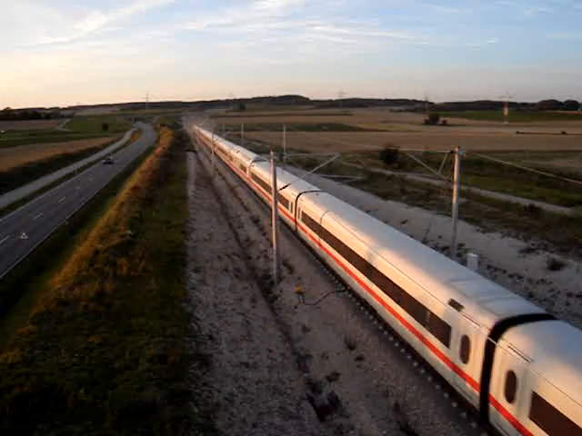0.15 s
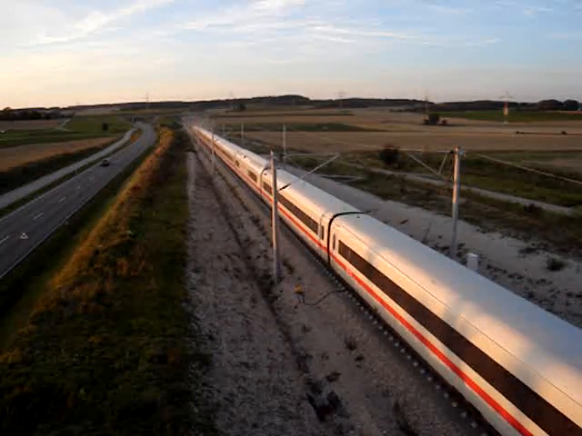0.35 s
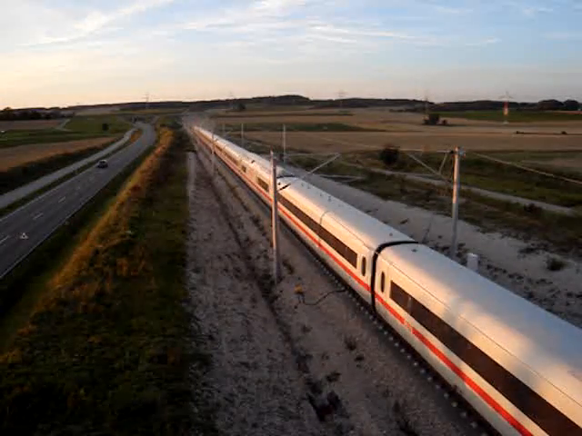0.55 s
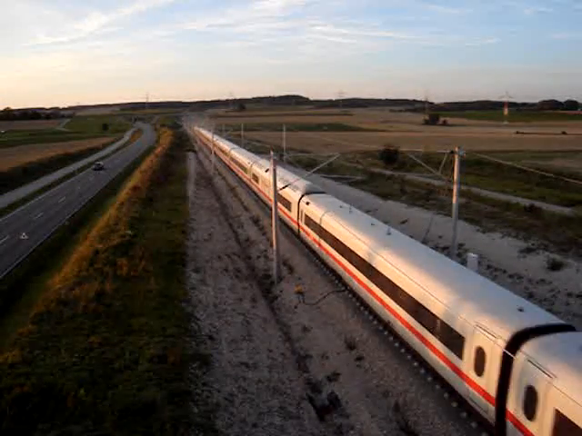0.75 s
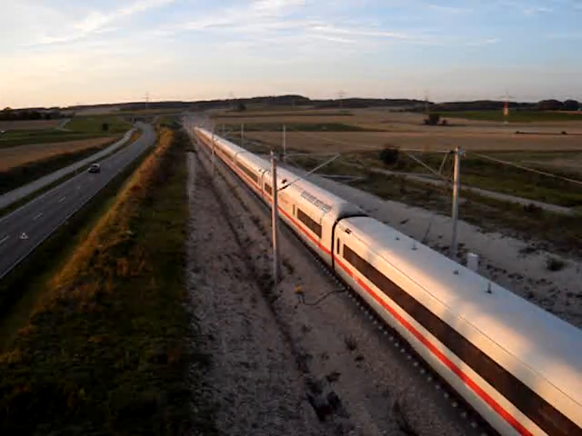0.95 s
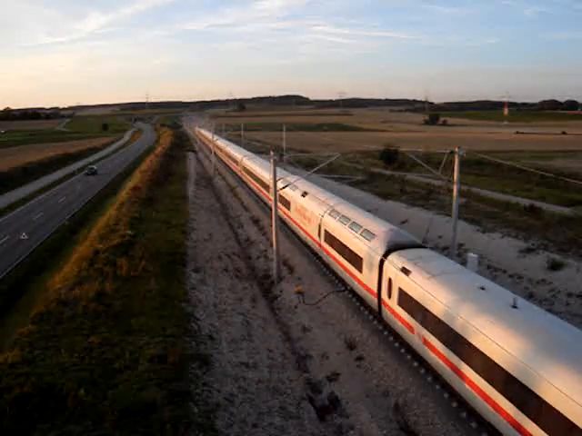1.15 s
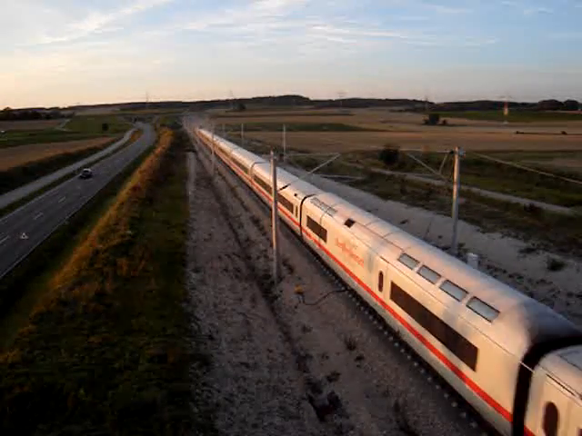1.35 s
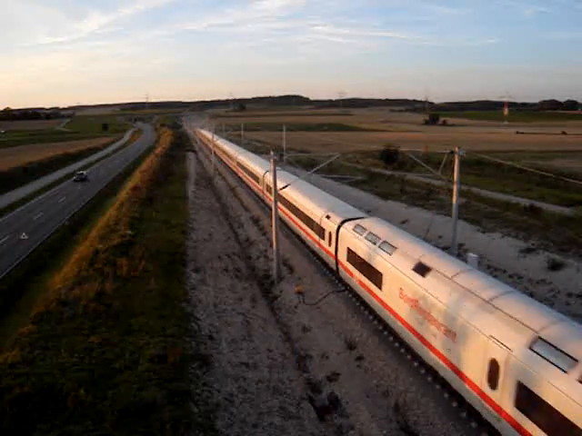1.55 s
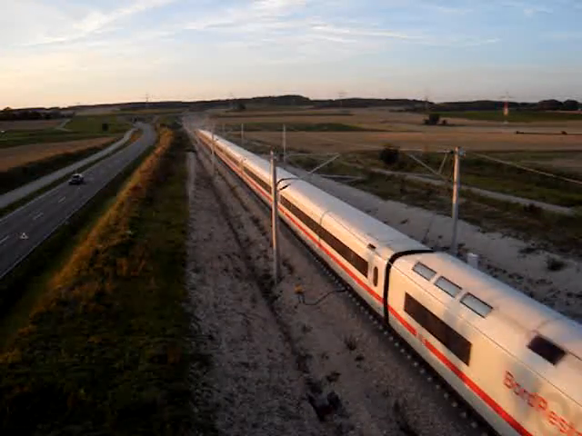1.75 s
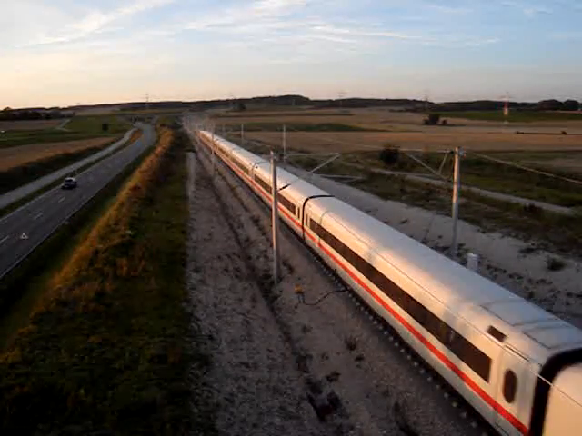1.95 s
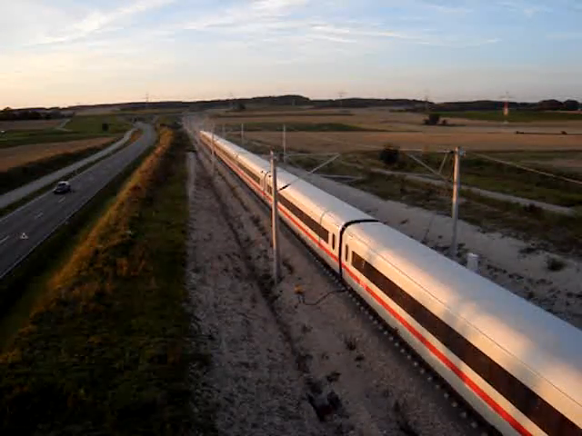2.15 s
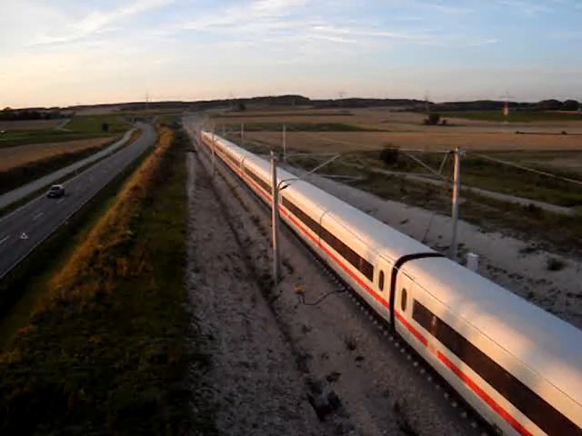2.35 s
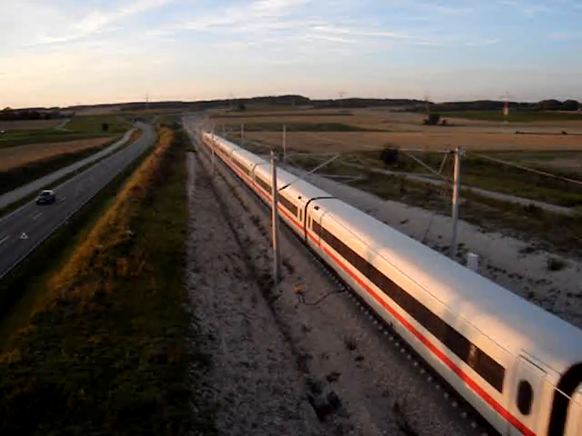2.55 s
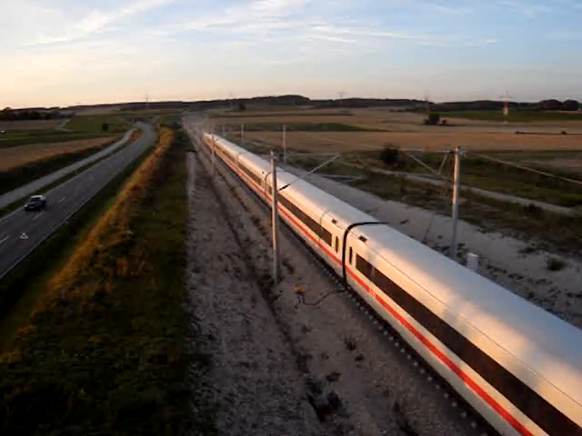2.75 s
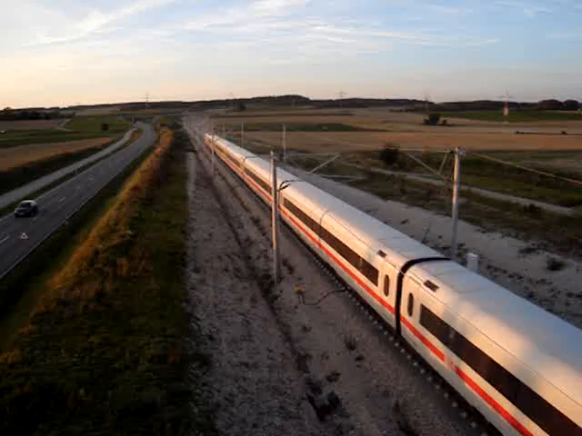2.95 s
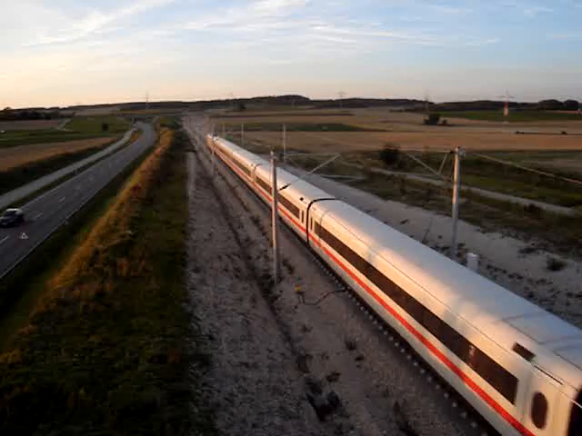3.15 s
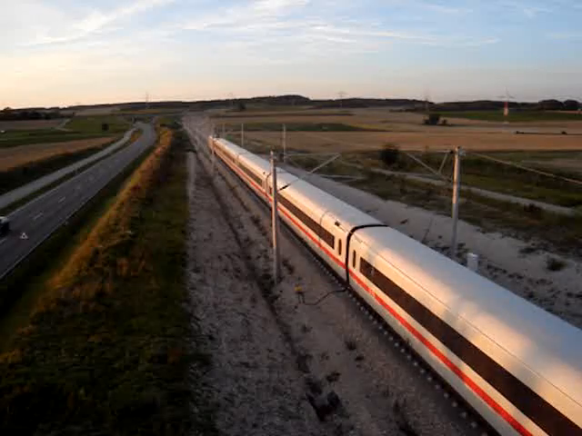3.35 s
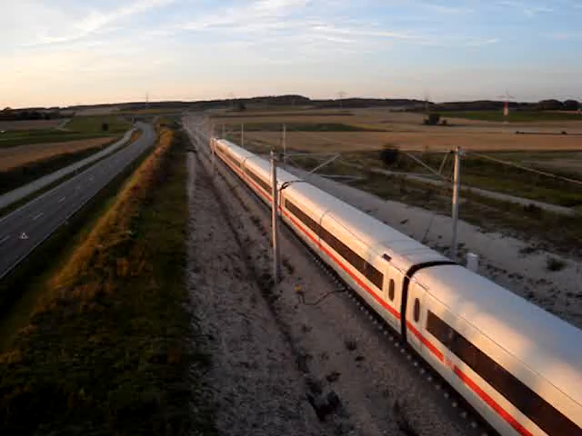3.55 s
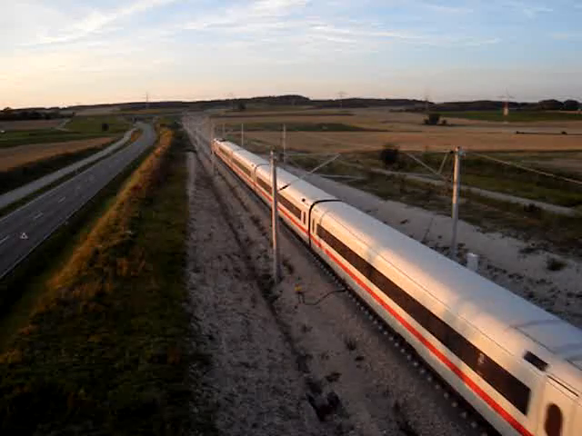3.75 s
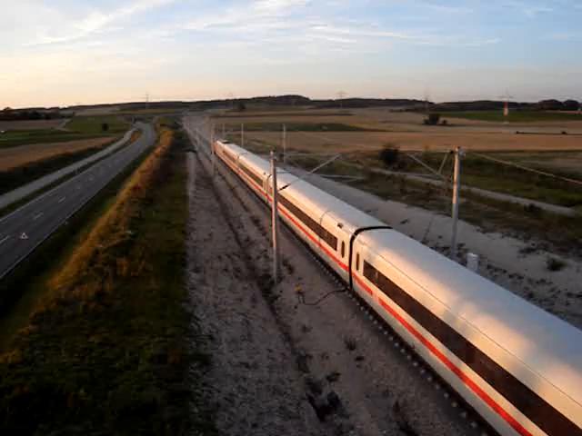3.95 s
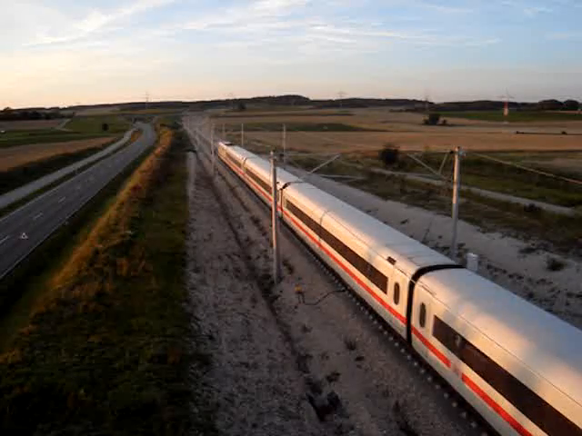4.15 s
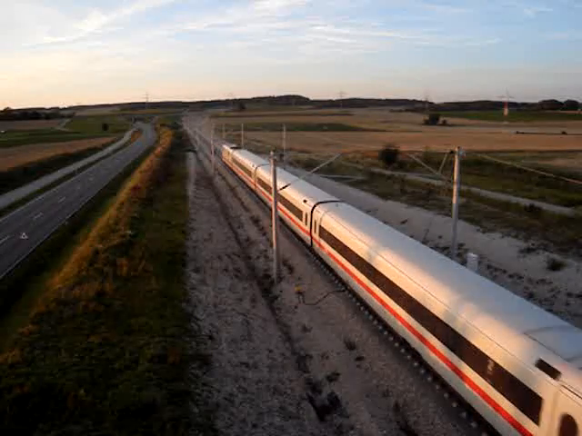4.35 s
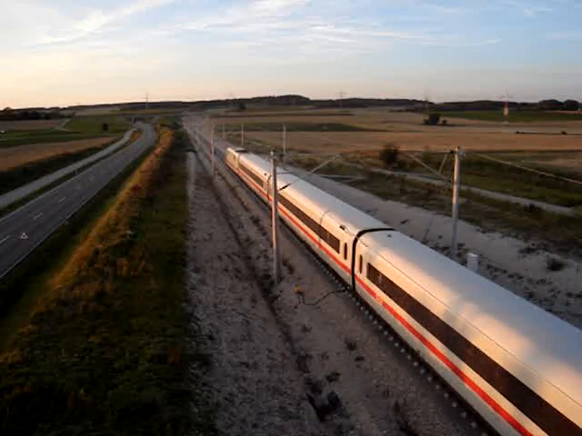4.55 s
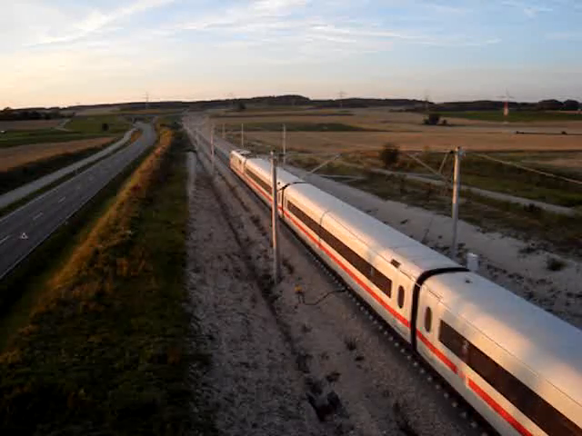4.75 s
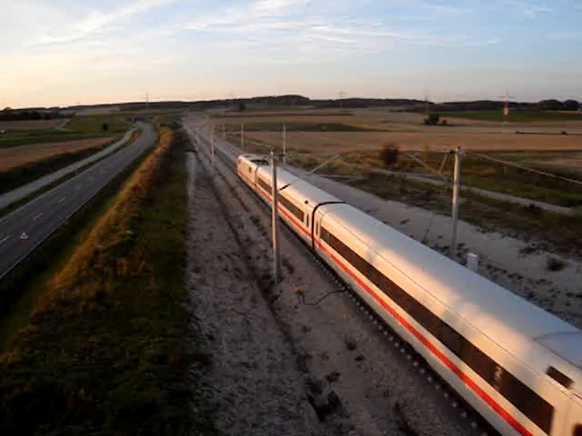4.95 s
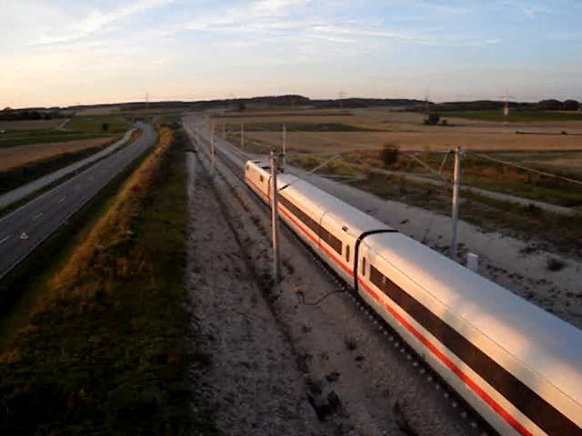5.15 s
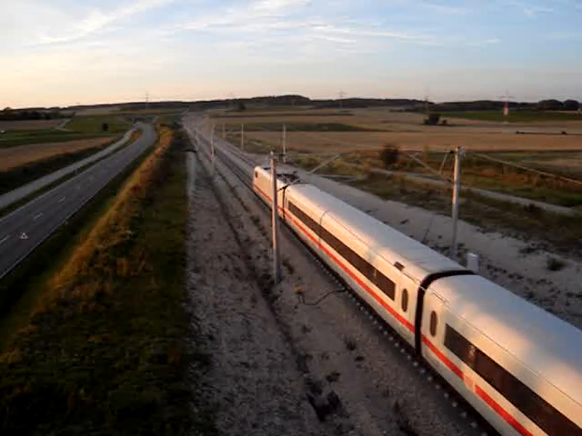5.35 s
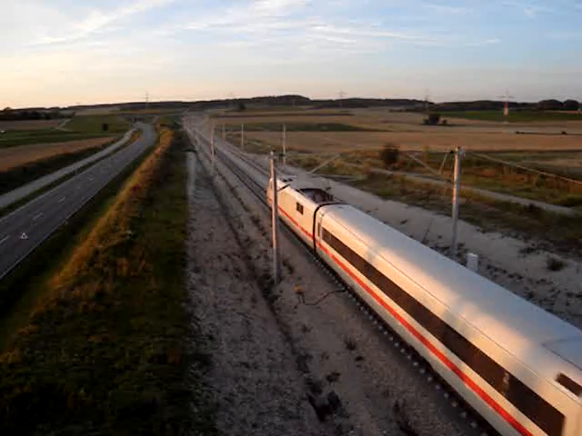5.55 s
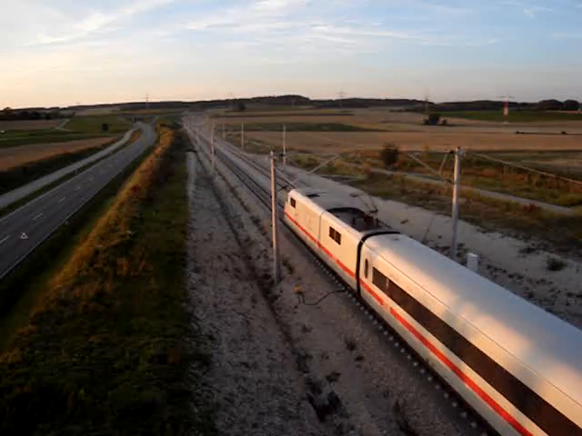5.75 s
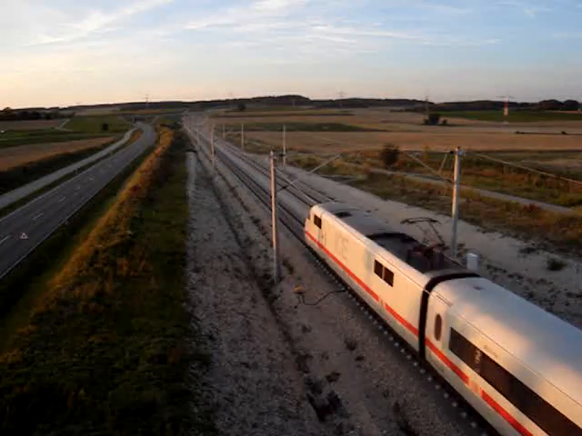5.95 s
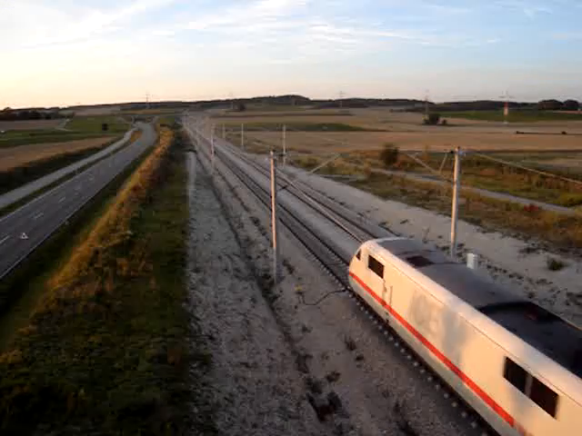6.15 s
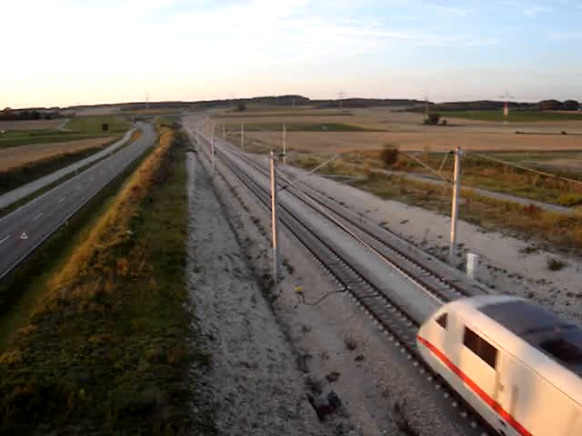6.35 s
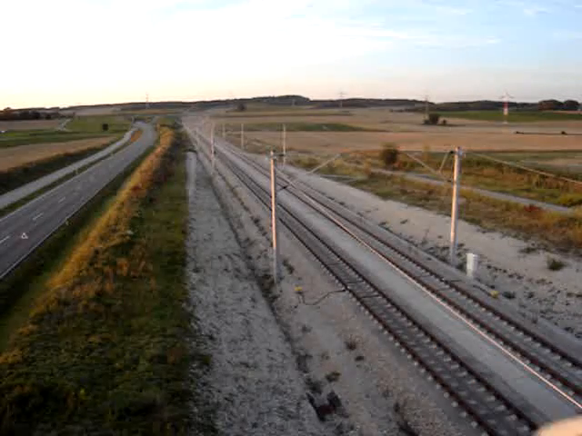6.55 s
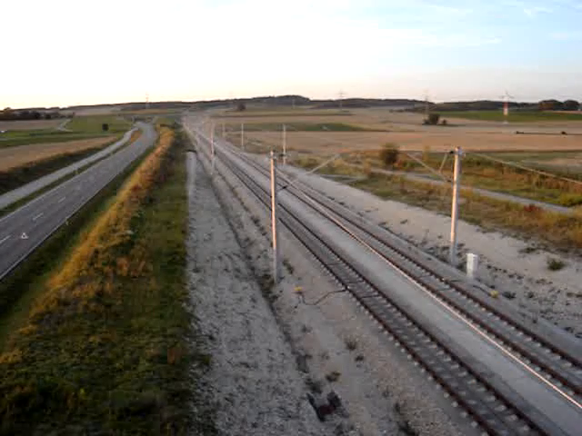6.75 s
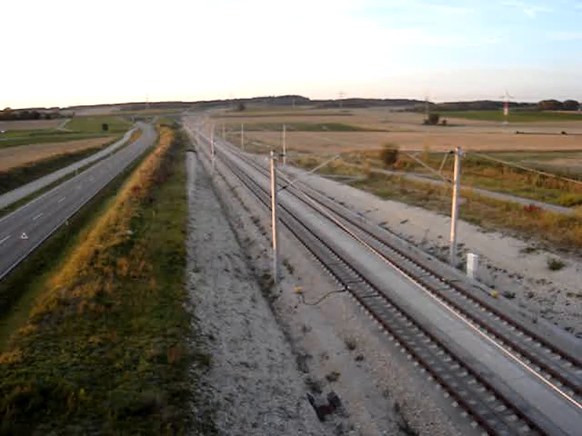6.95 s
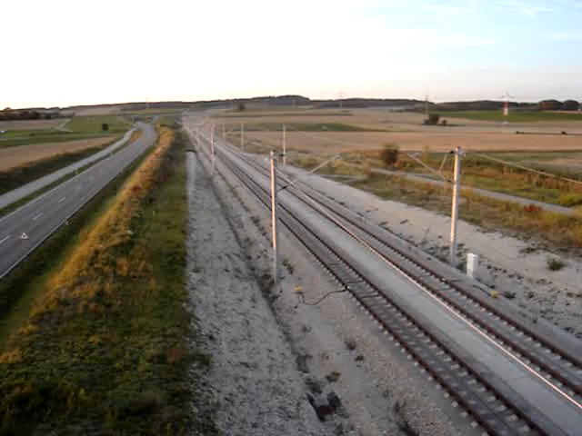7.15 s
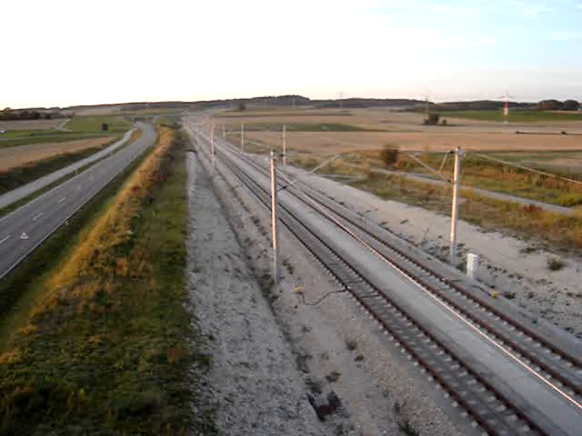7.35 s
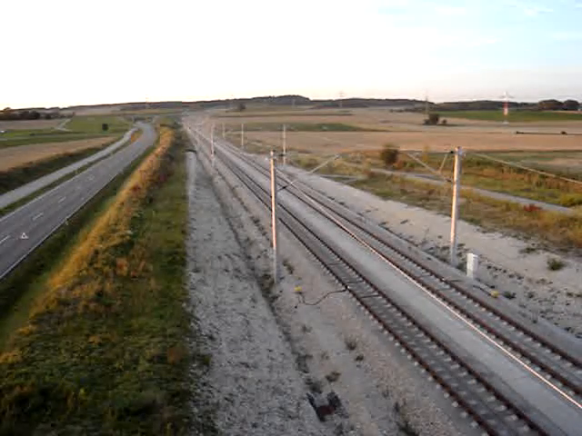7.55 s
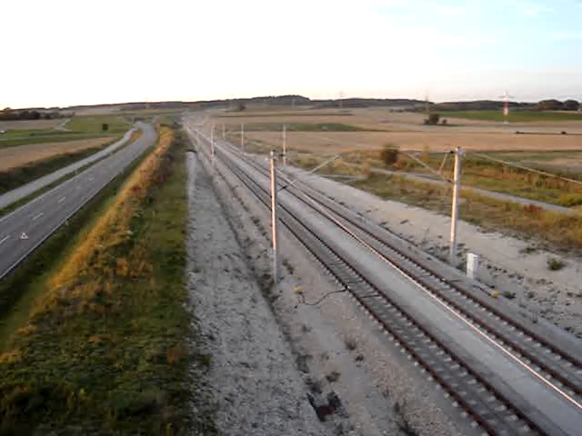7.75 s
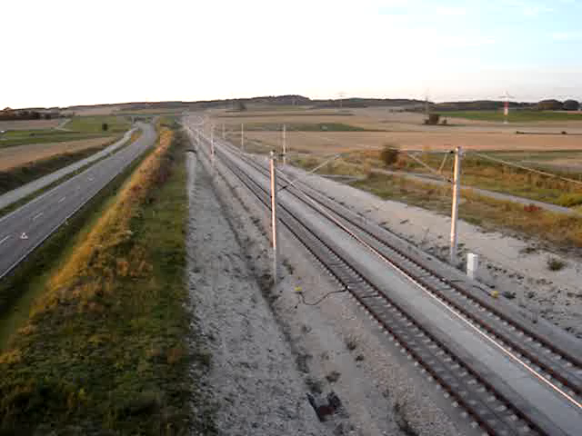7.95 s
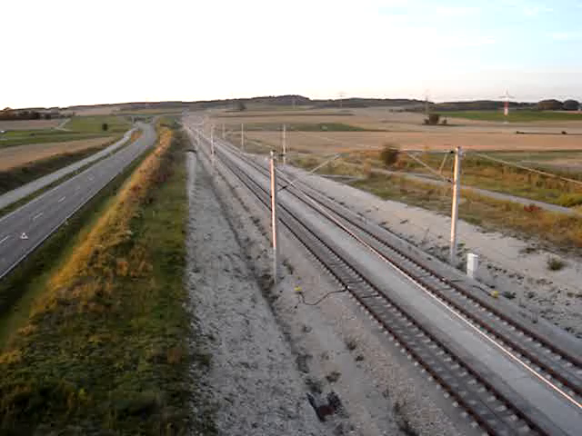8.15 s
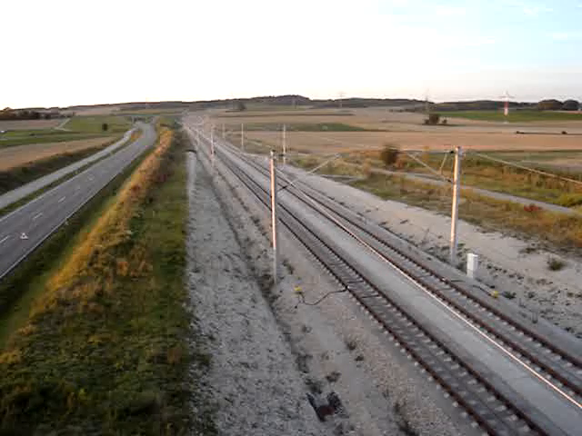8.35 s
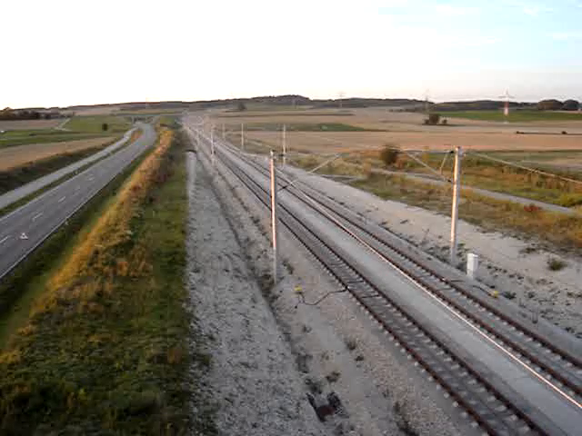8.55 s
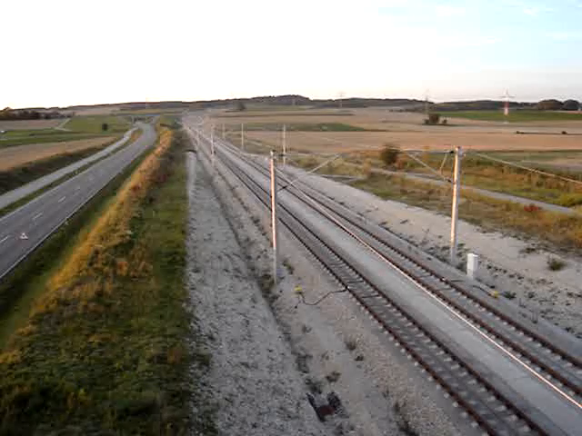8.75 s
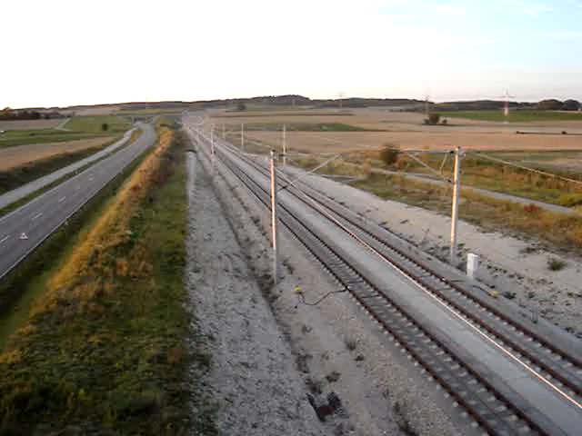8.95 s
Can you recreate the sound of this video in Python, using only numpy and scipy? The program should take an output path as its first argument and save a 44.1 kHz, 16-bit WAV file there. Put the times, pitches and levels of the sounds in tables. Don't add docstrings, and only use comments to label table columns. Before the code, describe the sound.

From a bridge over an open-country railway, a long fast train streams by close below. Broad wheel and air roar holds loud, with narrow rail tones swelling several times a second, high rim rings and faint wire hiss. The rear power car growls and squeals, slips under the bridge, and the sound falls sharply to a duller, distant roar with low wavering tones.

```python
import sys
import numpy as np
from scipy import signal
from scipy.fft import rfft, irfft, next_fast_len
from scipy.io import wavfile
from scipy.ndimage import uniform_filter1d

SR = 44100
rng = np.random.default_rng(int(sys.argv[2]) if len(sys.argv) > 2 else 0)


def store_wav(level_fs):
    pcm = np.round(np.clip(np.atleast_2d(level_fs), -1, 1) * 32767)
    wavfile.write(sys.argv[1], SR, pcm.T.astype(np.int16))


def volts_from_decibels(level):
    exponent = np.asarray(level, float) / 20
    return 10 ** exponent


N = 400869
T = np.arange(N) / SR

SLOWING = .0042
COACH_S = .58
LAST_COACH_S = 6.5
JOINT_S = 0.18
# time in seconds, hidden share from 0 to 1.
BRIDGE_SHADE = [
    (6.74, 0.02),
    (6.9, 0.26),
    (7.05, 0.88),
]
# time abreast in seconds, weight in dB, wheel roughness in dB,
# level of the coming song in dB, gust in dB.
JOINTS = [(.27, -2.5, -2.5, -28, -0.5), (.86, -0.5, -3.5, -28, -0.5), (1.43, -0.5, -1.5, -31.5, 0.5),
          (2.02, 1.5, .5, -39.5, 0.5), (2.6, -1.5, -0.5, -32, -1), (3.18, 0.5, 2, -43, -3.5),
          (3.73, 1, 0.5, -29, -.5), (4.33, 1, 0.5, -28, -.5), (4.98, -3, -1.5, -33.5, 0.5),
          (5.53, -.5, 0, -28.5, -0.5), (6.21, 2.5, -1.5, -29.5, 1.5), (6.68, 2, 4, -43.5, 2)]

ZONES = [
    (100, 450),
    (450, 850),
    (2150, 3600),
    (5700, 9000),
]
# frequency in Hz, level in dB per Hz.
NEAR_SPECTRUM = [(15, -60.5), (25, -39), (187, -27), (316, -22), (396, -15.5), (801, -8), (931, -3.5),
                 (1390, -15.5), (1880, -12.5), (2360, -13.5), (2810, -16), (4200, -20), (5680, -15.5),
                 (8290, -32.5), (10100, -53), (13200, -88.5), (22000, -120)]
# frequency in Hz, level in dB per Hz.
FAR_SPECTRUM = [(15, -58), (25, -25), (196, -20.5), (301, -14.5), (427, -8.5), (864, -4.5), (1110, -8.5),
                (1460, -8.5), (1620, -6.5), (2240, -13.5), (2680, -15), (3710, -21), (5410, -21.5),
                (8710, -36), (10100, -42), (13200, -77), (22000, -120)]
# frequency in Hz, width in Hz, lift in dB.
NEAR_HUMPS = [(974, 180, 2), (1930, 250, 6.5), (2880, 360, 2.5), (5440, 500, 1)]
# frequency in Hz, width in Hz, lift in dB.
FAR_HUMPS = [(298, 54, 5), (640, 28, 6), (860, 200, 5), (1740, 350, 0.5)]
# frequency in Hz, share from 0 to 1.
FOLLOW = [(60, .1), (250, .9), (650, 0.4), (1100, 0.5), (1500, 1), (2800, .6), (4200, .6), (6300, 0.98),
          (9000, 0)]
# mean level in dB, swell at a joint in dB, its lag in seconds,
# unsteadiness in dB.
IN_VIEW = [
    (-37, 0.5, -.05, 0.2),
    (-24.5, -0.46, -.02, 0.94),
    (-29, .8, .01, 0.32),
    (-33.5, 1.5, 0.049, 0.05),
]
RUSH_FOLLOWS = (-0.16, .05, .12)
# start of the drop in seconds, its length in seconds, level at 8 s in dB,
# growth in dB per second, share of the far roar's return, slowness of the start (exponent).
HIDDEN = [
    (6.75, 0.15, -39, 1, 1.1, 1.7),
    (6.66, 0.36, -32.5, -0.5, .9, 1.6),
    (6.754, 0.44, -43.5, 0, .3, 1.4),
    (6.64, 0.49, -49.5, -4.5, .1, 1.05),
]
# time in seconds, level in dB.
FAR_RETURN = [(7.1, 1.5), (7.4, 1), (7.7, 0), (8.0, 1.5), (8.3, 1.5), (8.6, 1.5), (9.09, 1.5)]

# frequency at the first speed in Hz, width in Hz.
SONG_TONES = [
    (889, 4.5),
    (965, 11),
    (1905, 20),
    (2096, 13),
    (1803, 16),
]
SONG_BED_DB = [-36.5, -32, -44.5, -46.5, -47]
# time in seconds, half length in seconds, level in dB.
LEAVING_SONG = [(0.23, 0.214, -23.5), (0.41, 0.06, -25.5), (1.06, 0.17, -22.5), (1.61, 0.066, -24),
                (1.91, 0.14, -26.5), (2.25, 0.064, -23), (2.52, 0.11, -25), (3.14, 0.17, -19.5),
                (3.52, 0.069, -23.5), (3.73, 0.052, -26.1), (4.0, 0.11, -20), (4.55, 0.071, -23.5),
                (4.75, 0.046, -24.5), (5.35, 0.06, -22), (5.55, .05, -27), (5.75, 0.067, -24.5),
                (5.95, .06, -31), (6.15, .06, -30), (.75, .08, -35), (1.35, 0.11, -32), (2.8, 0.088, -31),
                (3.35, 0.074, -33), (4.3, .12, -35), (4.95, .08, -28), (5.15, .06, -24.5),
                (6.56, 0.045, -27.8), (6.86, 0.14, -25)]
# time in seconds, half length in seconds, level in dB.
ABREAST_SONG = [(0.11, 0.09, -22.5), (0.35, 0.057, -24), (0.67, 0.085, -20.5), (1.26, 0.079, -20),
                (1.7, 0.072, -21.5), (2.28, 0.181, -23.5), (3.38, 0.12, -22), (3.86, 0.054, -22.5),
                (4.07, 0.053, -32), (4.4, .1, -25), (4.65, 0.066, -20), (4.15, .1, -35), (2.45, .05, -31),
                (3.05, .1, -31), (3.6, .08, -34), (4.8, 0.035, -27), (5.04, 0.067, -22.5),
                (5.25, 0.059, -23.5), (5.69, 0.082, -24.5), (5.91, 0.12, -26), (6.21, 0.054, -24),
                (6.43, 0.069, -20), (6.71, 0.061, -22)]
# time in seconds, half length in seconds, level in dB.
OCTAVE_SONG = [(0.29, 0.28, -27), (0.9, 0.19, -26.5), (1.55, 0.091, -28), (1.84, 0.065, -25.5),
               (2.07, 0.068, -24), (2.55, 0.3, -30.5), (2.85, 0.046, -32), (3.17, 0.041, -25.5),
               (3.48, 0.267, -34.5), (3.91, 0.16, -32), (4.61, 0.15, -32), (5.1, 0.12, -27),
               (5.72, 0.15, -31), (6.03, 0.031, -24.5), (6.34, 0.16, -30)]
# time in seconds, half length in seconds, level in dB.
LOW_OCTAVE_SONG = [(.2, .06, -35), (.57, .12, -32.5), (1.2, 0.16, -29.5), (1.78, 0.18, -30.5),
                   (2.4, .12, -34.5), (2.9, .07, -31), (3.9, 0.11, -38), (5.3, .07, -33), (5.802, .1, -31),
                   (6.76, .1, -33)]
# frequency at the first speed in Hz, width in Hz, level in dB,
# point of the coach where it is loudest from 0 to 1, swing in dB.
FAINT_TONES = [(791, 6.9, -43, .95, 10.5), (1023, 12, -33.5, 0.77, 5), (1148, 25, -50, .15, 3.5),
               (2017, 68, -40, 0, 2), (2723, 45, -41, 0.02, 7), (2874, 46, -41, 0.7, 4),
               (3090, 30, -43, 0.39, 4.5), (4650, 21, -52.5, 0.95, 11), (4850, 78, -49.5, 1, -1.5)]

# frequency at the first speed in Hz, width in Hz, level in dB.
RIM_TONES = [
    (5675, 65, -4),
    (5900, 300, -6),
]
# time in seconds, half length in seconds, level in dB.
RIM_FLARES = [(0.08, 0.022, -32), (0.54, 0.18, -34), (1.01, 0.021, -23), (1.16, 0.34, -42),
              (1.61, 0.036, -30), (2.21, 0.123, -30.5), (2.37, 0.032, -33), (2.81, 0.18, -34),
              (3.35, 0.054, -29), (4.24, 0.095, -42), (4.73, 0.053, -26.5), (5.13, 0.055, -27),
              (5.7, 0.046, -32), (5.86, 0.12, -32), (6.07, 0.077, -30), (6.32, 0.042, -31)]
# frequency in Hz, width in Hz, level in dB, swell in dB, share of the gust.
GAP_WHISTLE = (6220, 230, -43, 7, 1.2)

# frequency in Hz, width in Hz, level in dB.
CHIRR = [(8720, 170, -63.5), (9715, 70, -74), (8125, 30, -80)]
# frequency in Hz, width in Hz, level in dB.
WIRE_HISS = (9500, 360, -57)

# time in seconds, length in seconds, frequency in Hz, width in Hz, level in dB.
SQUEALS = [(2.17, .07, 1037, 30, -25), (2.33, 0.065, 4650, 110, -38), (2.76, 0.043, 4640, 60, -38),
           (2.88, .04, 4530, 60, -32), (3.55, 0.14, 375.5, 30, -36.5), (4.3, 0.08, 375, 56, -36.5),
           (4.396, 0.096, 3017, 51, -27.5), (5.5, 0.16, 2970, 81, -32.5), (5.45, 0.14, 2700, 170, -35),
           (6.03, 0.04, 3005, 11, -31), (6.05, 0.15, 378, 36, -36.5), (6.214, 0.18, 180, 19, -42),
           (6.259, 0.036, 388, 30, -28.5), (6.45, 0.28, 1097, 40, -27), (6.7, .07, 1040, 47, -26),
           (6.55, 0.12, 4330, 690, -30), (6.825, 0.024, 2620, 29, -26), (6.92, .07, 2615, 18, -42),
           (6.73, .03, 2780, 80, -33), (3.13, .06, 3010, 25, -34), (3.88, .04, 4700, 40, -36),
           (5.5, 0.058, 1002, 50, -27), (5.85, .05, 2990, 31, -31), (6.77, .04, 4400, 700, -31.5)]
# time in seconds, length in seconds, frequency in Hz, width in Hz,
# level in dB.
GROWL = [(6.57, 0.049, 540, 22, -29), (6.71, 0.09, 342, 14, -24.5), (6.6, 0.12, 365, 56, -30),
         (6.46, .035, 365, 45, -29)]

# frequency at 8 s in Hz, width in Hz.
FADING_TONES = [
    (307, 6),
    (858, 6),
    (1599, 6),
    (2401, 3),
    (926, 6),
    (800, 6),
    (737, 6),
]
FADING_BED_DB = [-55, -51, -48.5, -61, -54, -45, -44]
# time in seconds, half length in seconds, level in dB.
HUM_SWELLS = [(7.48, 0.129, -47), (7.96, 0.07, -44), (8.27, 0.071, -44.2), (8.55, 0.33, -40)]
# seconds, seconds, dB.
SONG_SWELLS = [(7.0, 0.057, -32.6), (7.4, 0.16, -33), (8.49, 0.16, -41), (8.79, 0.082, -33)]
# seconds, seconds, dB.
OCTAVE_SWELLS = [(7.34, 0.14, -44), (7.95, 0.13, -41.1), (8.32, 0.26, -38.5), (8.74, 0.047, -42)]
# seconds, seconds, dB.
THIN_SWELLS = [(7.62, .08, -54), (7.8, 0.13, -47), (8.2, 0.1, -51), (8.5, 0.09, -50), (8.78, .1, -49),
               (9.16, 0.24, -46)]
# seconds, seconds, dB.
UPPER_SWELLS = [(7.3, 0.22, -33.5), (7.62, 0.081, -38), (7.8, 0.037, -32), (9.05, .1, -40)]
# seconds, seconds, dB.
LOWER_SWELLS = [(7.3, 0.092, -37), (8.0, 0.1, -35.5), (8.53, 0.091, -32)]
# seconds, seconds, dB.
LOWEST_SWELLS = [(7.35, 0.087, -45), (8.55, 0.18, -39), (8.95, 0.21, -38)]
# frequency at 8 s in Hz, width in Hz, level in dB, growth in dB per second.
WEAK_TONES = [(600, 14, -40, 9), (1705, 13.4, -48, -5.5), (1740, 20, -46.5, -4.5), (1043, 14, -50, -4.5),
              (1826, 13, -46.5, 1), (2000, 9.1, -49.5, 2), (2620, 20, -57, -5), (5507, 30, -71, 2)]

# time in seconds, lowest and highest frequency in Hz.
DROPOUT = (7.638, 5200, 6500)
CEILING_HZ = 10130


def in_time(rows):
    s, *columns = np.transpose(rows)
    return np.array([np.interp(T, s, column) for column in columns])


def bells(rows):
    coarse = T[::100]
    total = sum(height * np.exp(-((coarse - s) / max(half, .02)) ** 2) for s, half, height in rows)
    return np.interp(T, coarse, total)


def swells(rows, bed_db):
    power = bells([(s, half, volts_from_decibels(db) ** 2) for s, half, db in rows])
    return np.sqrt(volts_from_decibels(bed_db) ** 2 + power)


def joints(lag):
    return bells([(s + lag, JOINT_S, 1) for s, *_ in JOINTS])


def chance(rate_hz):
    r = np.exp(-40 * np.pi * rate_hz / SR)
    noise = rng.standard_normal(N // 20 + 3002)
    slow = signal.lfilter([1], [1, -2 * r, r * r], noise)[3000:]
    return slow / slow.std()


def filled(slow, span=slice(None)):
    return np.interp(np.arange(N)[span] / 20, np.arange(len(slow)), slow)


def drift(rate_hz):
    return filled(chance(rate_hz))


def tone(hz, width_hz, steady=0, span=slice(None)):
    wander = chance(width_hz) + 1j * chance(width_hz)
    evened = wander * (2 ** .5 / abs(wander)) ** steady
    wander = filled(evened, span)
    turns = np.cumsum((hz * np.ones(N))[span]) / SR
    phase = (2 * np.pi * (turns % 1)).astype(np.float32)
    out = np.zeros(N)
    out[span] = wander.real * np.cos(phase) - wander.imag * np.sin(phase)
    return out


def colour(points, humps, hz):
    points_hz, points_db = np.transpose(points)
    db = np.interp(np.log(hz), np.log(points_hz), points_db)
    for at, width, lift_db in humps:
        db = db + lift_db / (1 + ((hz - at) / width * 2) ** 2)
    return volts_from_decibels(db)


def zone_levels():
    weight_db, rough_db, song_db, gust_db = in_time(JOINTS)
    rush_db = np.dot(RUSH_FOLLOWS, [rough_db, gust_db, song_db - song_db.mean()])
    far_return_db = in_time(FAR_RETURN)[0]
    levels = []
    for own_db, in_view, behind in zip([weight_db, rough_db, rush_db, gust_db], IN_VIEW, HIDDEN):
        db, swell_db, lag, loose_db = in_view
        start, takes, far_db, growth_db, share, slowness = behind
        near = db + own_db + swell_db * joints(lag)
        far = far_db + growth_db * (T - 8) + share * far_return_db
        hidden = np.sin(np.pi / 2 * np.clip((T - start) / takes, 0, 1)) ** slowness
        levels.append(near + hidden * (far - near) + loose_db * drift(16.0))
    return np.array(levels)


def roar(shade, patchy_db):
    size = next_fast_len(N)
    hz = np.maximum(np.arange(size // 2 + 1) * SR / size, 1)
    colours = np.array([colour(NEAR_SPECTRUM, NEAR_HUMPS, hz), colour(FAR_SPECTRUM, FAR_HUMPS, hz)])
    both = colours * rfft(rng.standard_normal((2, size)))
    mix = np.sqrt([1 - shade, shade])
    power = []
    for lo, hi in ZONES:
        band = both[:, (hz > lo) & (hz < hi)]
        power.append(2 * np.sum(abs(band) ** 2, axis=1) / size ** 2)
    gains_db = zone_levels() - 10 * np.log10(np.array(power) @ mix ** 2)
    centres = np.log2([lo * hi for lo, hi in ZONES]) / 2
    follow_hz, follow_share = np.transpose(FOLLOW)
    dropping = np.minimum(bells([(6.9, .3, 2)]), 1)
    gust = drift(6.3)
    out = 0
    for octave in np.arange(13, 41) / 3:
        window = np.cos(np.pi / 2 * np.clip(3 * (np.log2(hz) - octave), -1, 1)) ** 2
        place = np.interp(octave, centres, np.arange(len(ZONES)))
        low = min(int(place), len(ZONES) - 2)
        level_db = gains_db[low] + (place - low) * (gains_db[low + 1] - gains_db[low])
        calm_db = uniform_filter1d(level_db, size=SR // 4)
        follow = np.maximum(np.interp(octave, np.log2(follow_hz), follow_share), dropping)
        level_db = calm_db + follow * (level_db - calm_db)
        flicker_db = patchy_db * min(place, 2.2) * (0.4 * gust + drift(18.0))
        noise = np.sum(mix * irfft(both * window, size)[:, :N], axis=0)
        out = out + volts_from_decibels(level_db + flicker_db) * noise
    return out


def rail_song(speed, shade):
    coaches = np.cumsum(speed) / SR / COACH_S
    coming_song = [(s, 0.59 * JOINT_S, db) for s, _, _, db, _ in JOINTS]
    songs = [LEAVING_SONG, ABREAST_SONG, OCTAVE_SONG, coming_song, LOW_OCTAVE_SONG]
    strong = np.zeros(N)
    for (hz, width), rows, bed_db in zip(SONG_TONES, songs, SONG_BED_DB):
        strong += volts_from_decibels(0.56) * swells(rows, bed_db) * tone(hz * speed, width, steady=0.99)
    out = strong * np.sqrt(1 - shade ** 2)
    ending = np.clip((LAST_COACH_S - T) * 10, .2, 1)
    for hz, width, db, at, swing_db in FAINT_TONES:
        uneven_db = 2.0 * drift(5.4)
        level_db = db + uneven_db + swing_db * np.cos(2 * np.pi * (coaches - at))
        out += volts_from_decibels(level_db) * tone(hz * speed, width) * ending * (1 - shade)
    return out


def wheel_rims(speed, shade):
    rims = sum(volts_from_decibels(db) * tone(hz * speed, width, steady=0.25) for hz, width, db in RIM_TONES)
    flaring = volts_from_decibels(2) * swells(RIM_FLARES, bed_db=-48) * rims
    hz, width, db, swell_db, share = GAP_WHISTLE
    whistle_db = db + swell_db * joints(0.033) + share * in_time(JOINTS)[3]
    whistle = volts_from_decibels(whistle_db) * tone(hz * speed, width)
    ending = np.clip((LAST_COACH_S + 0.22 - T) * 2.4, .1, 1)
    return (flaring + whistle) * ending * (1 - shade)


def chirr():
    sinking_db = -4.5 * np.maximum(T - 8, -1)
    return sum(volts_from_decibels(db + sinking_db + 2 * drift(5.0)) * tone(hz, width) for hz, width, db in CHIRR)


def overhead_wire(shade):
    hz, width, db = WIRE_HISS
    return volts_from_decibels(db) * tone(hz, width) * (1 - shade)


def squeals_and_growl():
    out = np.zeros(N)
    for rows, fall in [(SQUEALS, 0), (GROWL, .17)]:
        for s, length, hz, width, db in rows:
            span = slice(int((s - 4 * length) * SR), int((s + 4 * length) * SR))
            swell = volts_from_decibels(db) * bells([(s, length * 2 ** .5, 1)])
            out += swell * tone(hz * (1 - fall * (T - s)), width, steady=0.26, span=span)
    return out


def receding_train(shade):
    beyond = slice(np.argmax(shade > 0), N)
    sink = 1 - .003 * (T - 8)
    swell_tables = [HUM_SWELLS, SONG_SWELLS, OCTAVE_SWELLS, THIN_SWELLS,
                    UPPER_SWELLS, LOWER_SWELLS, LOWEST_SWELLS]
    out = np.zeros(N)
    for (hz, width), rows, bed_db in zip(FADING_TONES, swell_tables, FADING_BED_DB):
        out += volts_from_decibels(1.0) * swells(rows, bed_db) * tone(hz * sink, width, steady=0.96, span=beyond)
    for hz, width, db, growth_db in WEAK_TONES:
        level_db = db + growth_db * (T - 8.5) + 2 * drift(2.6)
        out += volts_from_decibels(level_db) * tone(hz * sink, width, steady=0.17, span=beyond)
    return shade * out


def scene():
    shade = np.clip(in_time(BRIDGE_SHADE)[0], 0, 1)
    speed = 1 - SLOWING * T
    mix = roar(shade, patchy_db=0.5448)
    mix = mix + rail_song(speed, shade)
    mix = mix + wheel_rims(speed, shade)
    mix = mix + chirr()
    mix = mix + overhead_wire(shade)
    mix = mix + squeals_and_growl()
    mix = mix + receding_train(shade)
    return mix[None]


def dropouts(x, top_share, edge_share):
    hz, s, cells = signal.stft(x, SR, nperseg=256, noverlap=192)
    odds = top_share * np.clip((hz / 3600 - 1) / 1.6, 0, 1)
    luck = rng.random((43, len(s) // 5 + 1))
    luck = np.repeat(np.repeat(luck, 3, axis=0), 5, axis=1)
    skipped = luck[:len(hz), :len(s)] < odds[:, None]
    ceiling_hz = CEILING_HZ - 1100 * np.clip(1 - luck[0, :len(s)] / edge_share, 0, 1)
    skipped |= hz[:, None] > ceiling_hz + 100
    at, lo, hi = DROPOUT
    skipped |= ((hz > lo) & (hz < hi))[:, None] & (abs(s - at) < .012)
    kept = signal.istft(cells * ~skipped, SR, nperseg=256, noverlap=192)[1][:, :N]
    low_pass = signal.ellip(14, .3, 65, CEILING_HZ, fs=SR, output="sos")
    return signal.sosfiltfilt(low_pass, kept)


def top_cut(x):
    return signal.sosfilt(signal.butter(12, 10280, fs=SR, output="sos"), x)


def record(dry):
    rounded = 1.5 * np.tanh(dry / 1.5)
    thinned = dropouts(rounded, top_share=.085, edge_share=.25)
    return top_cut(thinned)


dry = scene()
out = record(dry)
store_wav(out)
```